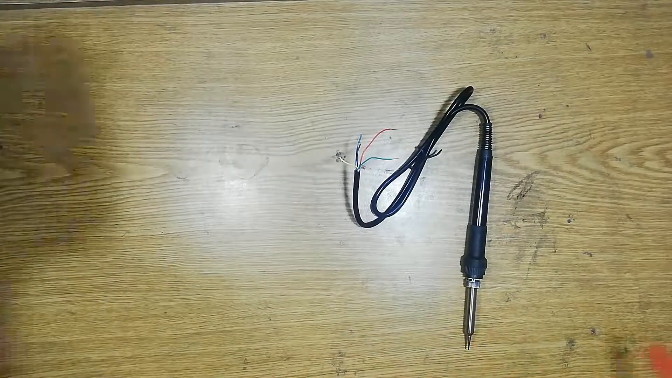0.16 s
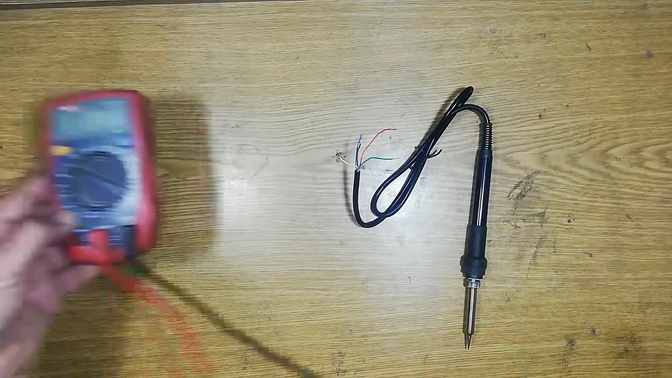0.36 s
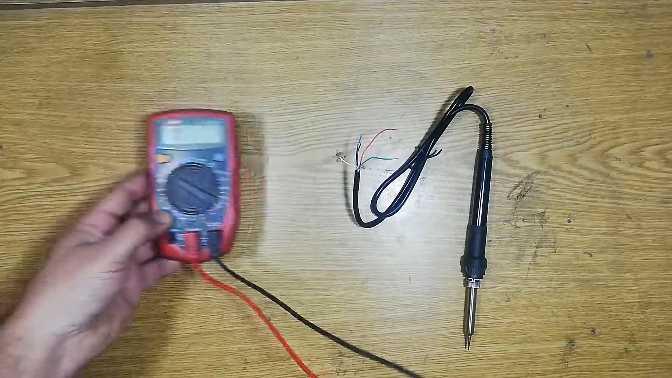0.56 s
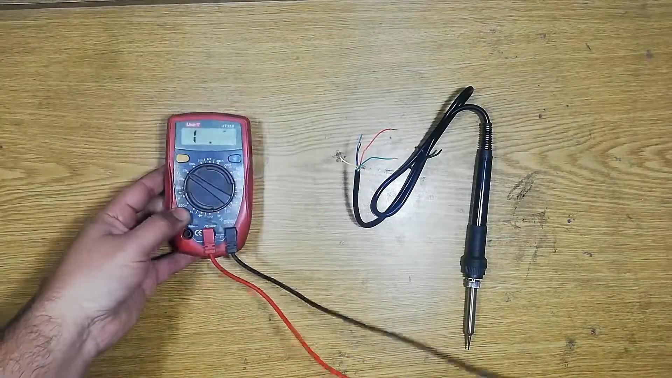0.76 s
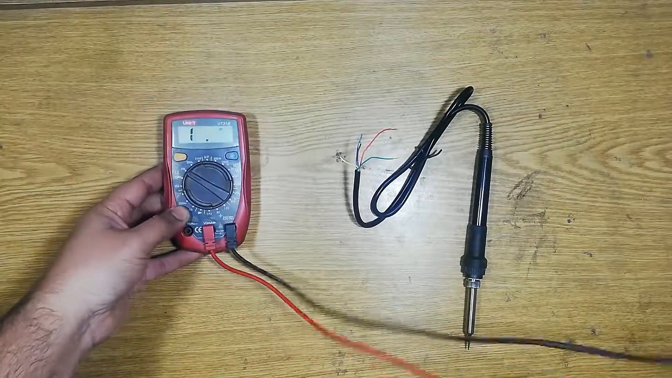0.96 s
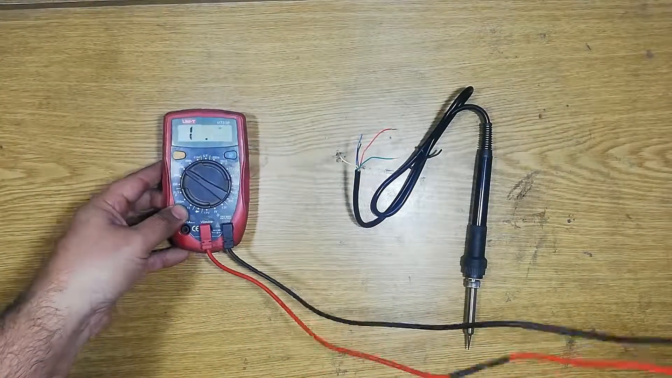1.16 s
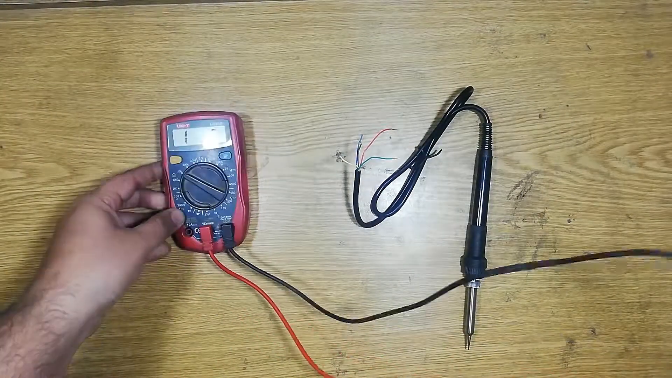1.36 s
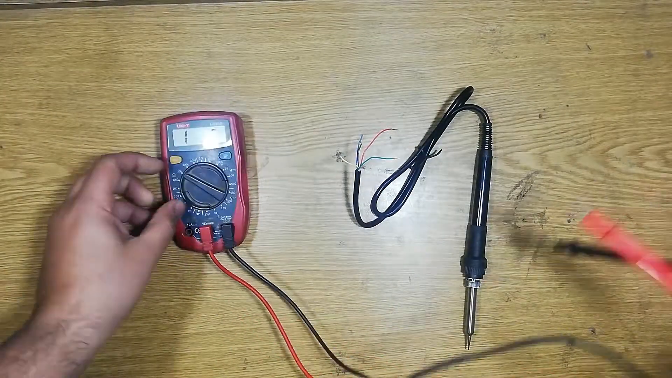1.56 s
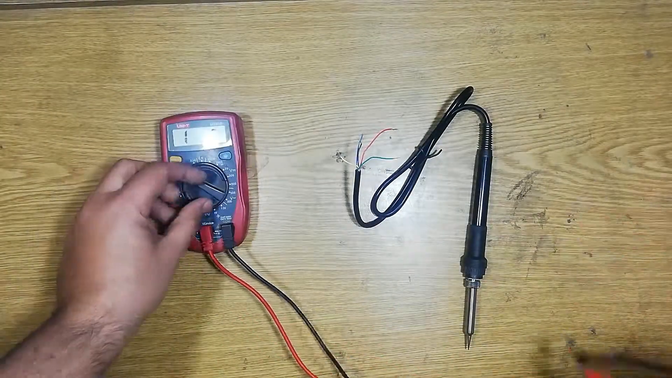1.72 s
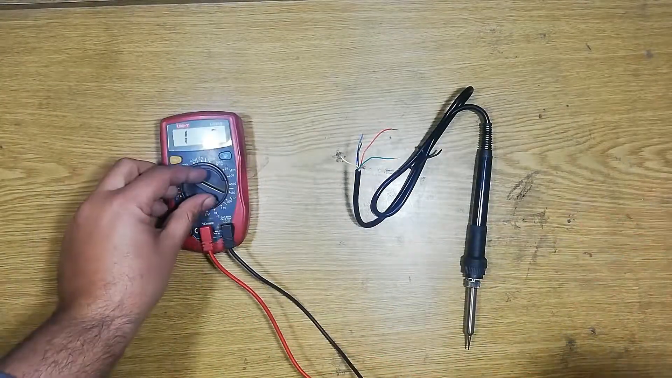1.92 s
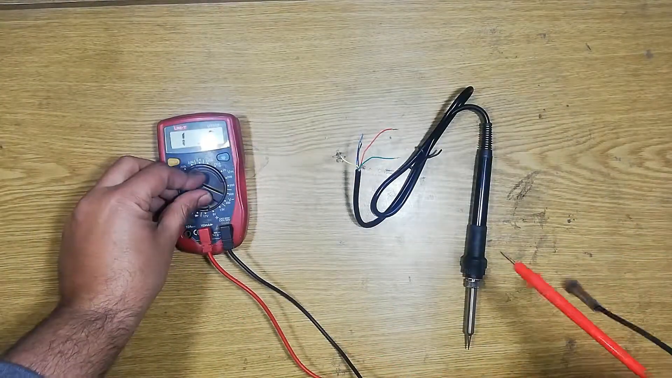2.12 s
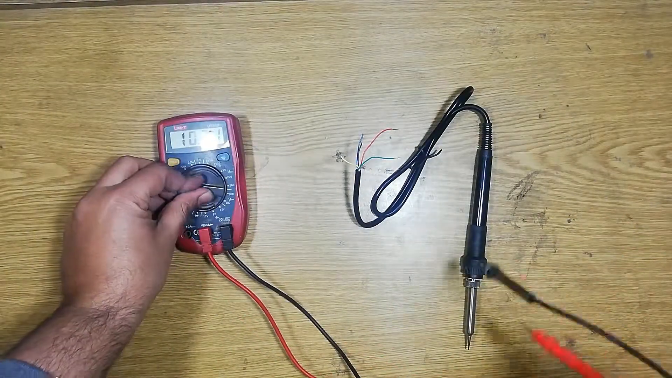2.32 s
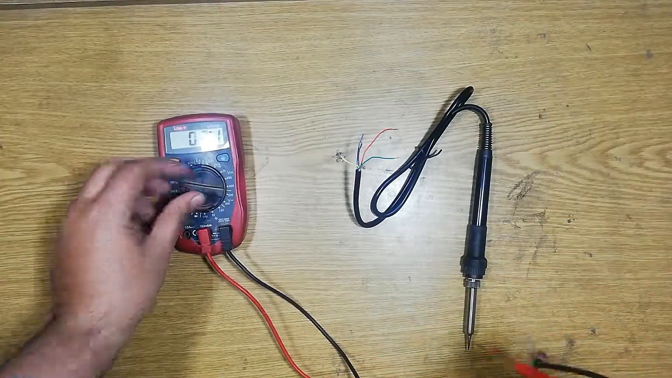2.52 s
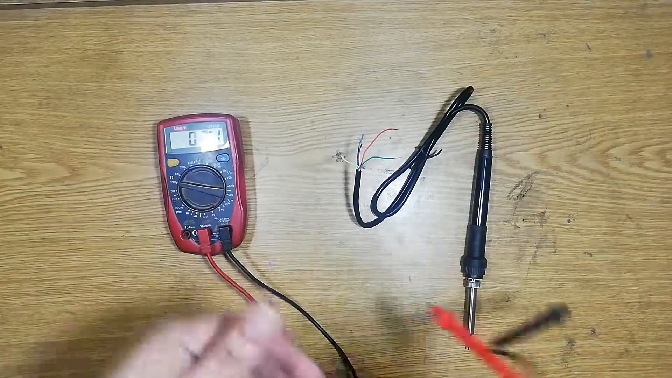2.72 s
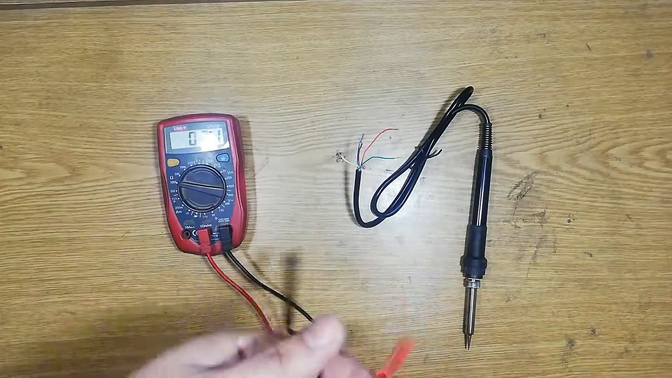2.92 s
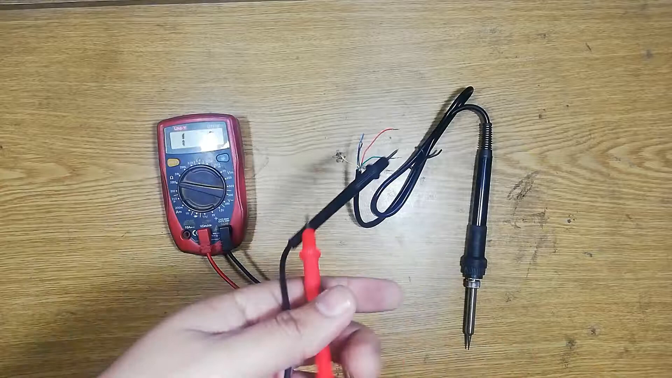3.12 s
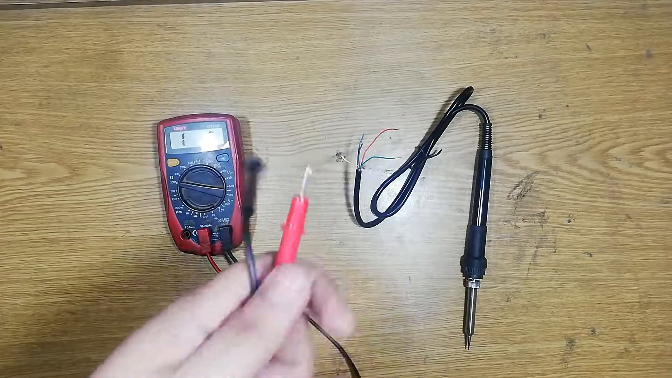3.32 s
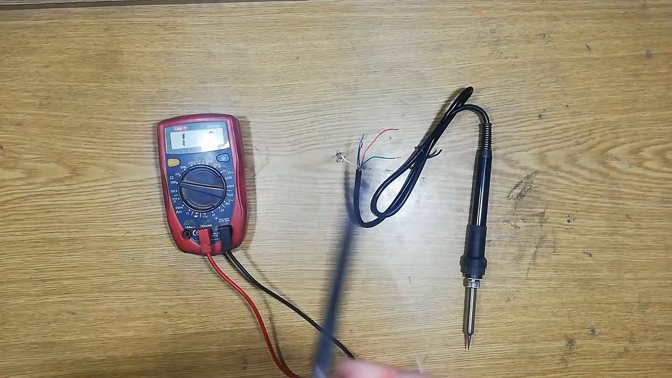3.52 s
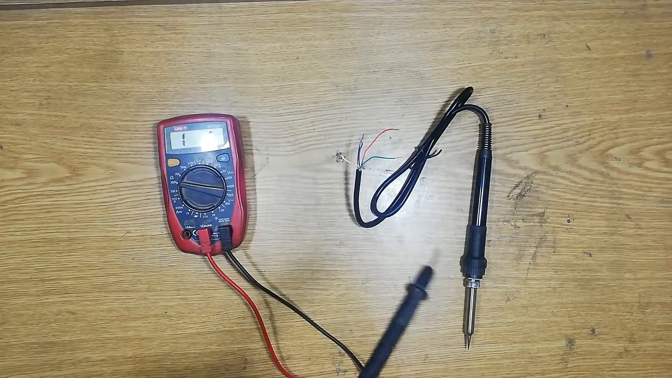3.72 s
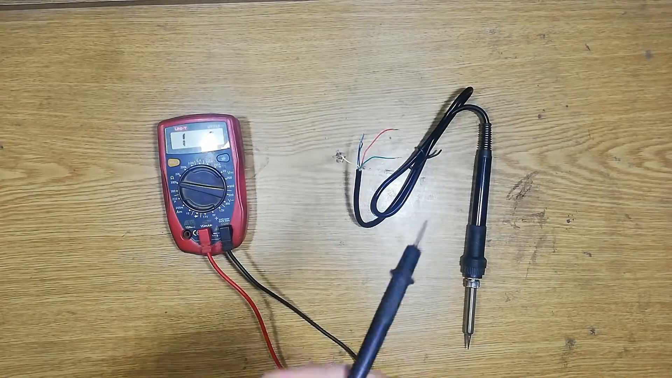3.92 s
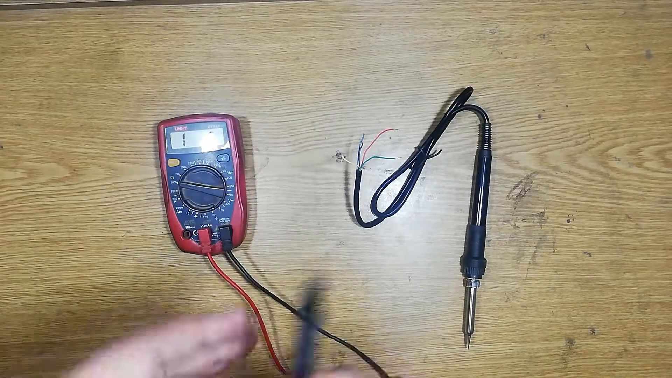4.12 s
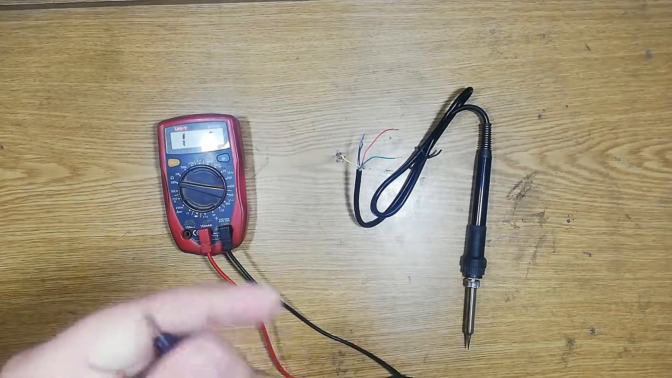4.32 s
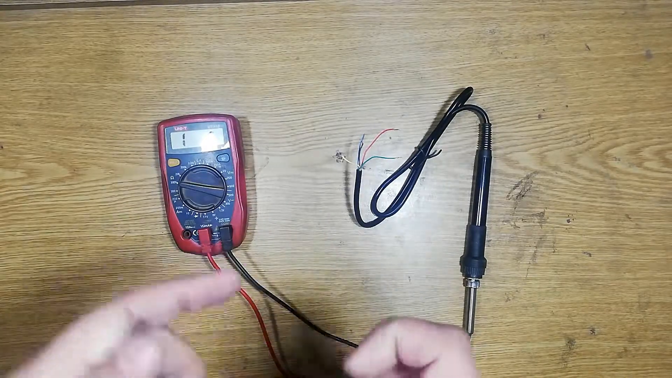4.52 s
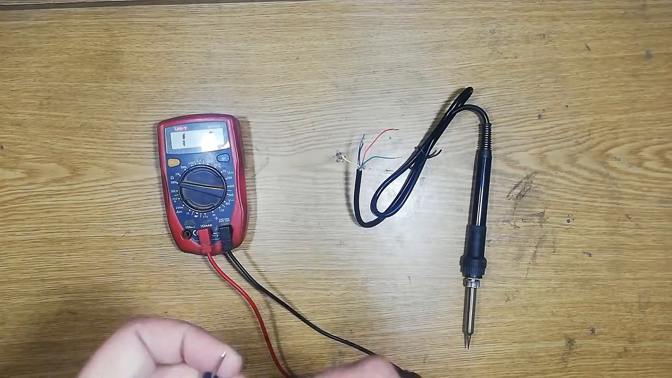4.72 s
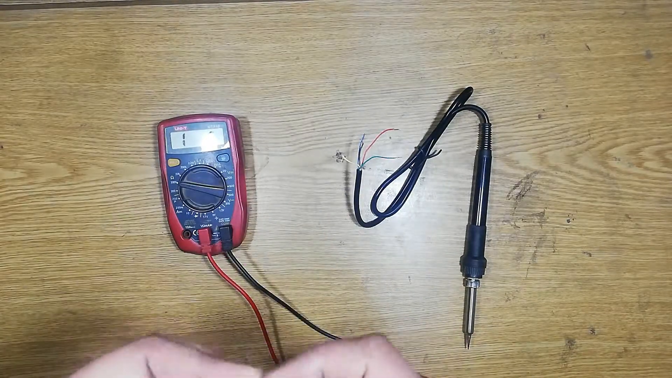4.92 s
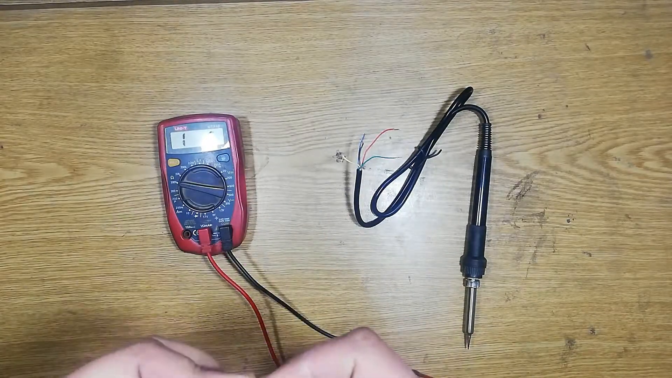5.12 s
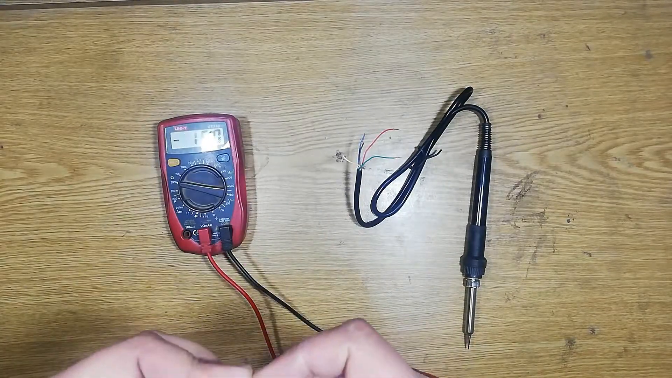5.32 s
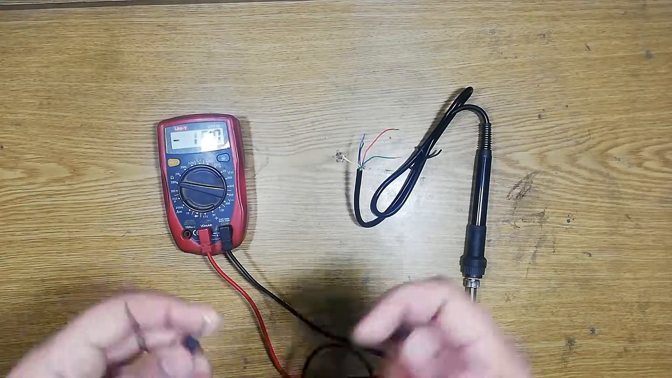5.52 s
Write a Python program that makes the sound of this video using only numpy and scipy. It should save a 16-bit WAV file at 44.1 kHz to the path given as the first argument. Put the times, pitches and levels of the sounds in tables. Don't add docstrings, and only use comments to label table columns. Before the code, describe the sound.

A low, steady hum fills a small bare room, with faint lead rustle and tiny ticks from 0.2 to 0.6 s. At 0.77 s a plastic meter hits a hollow wooden table in a rapid cluster of booming knocks and case clatter, with hard probe ticks until 0.95. Lighter taps lead to a second, brighter and louder burst at 1.28-1.34, overloading the overhead phone microphone. Leads drag around 1.45; metal tips clink at 1.85, with a soft low thump at 1.95. A dial snaps sharply at 2.3, then probe taps and detent clicks follow at 2.5-2.6. Bright ticks bounce at 2.8-3.2, a plastic handle lands at 3.35, and a small tick follows at 3.6. It grows quiet: a dull tap at 3.98, airy finger rubbing around 4.4-4.6, a bright nail flick at 4.93, and a small cap tap at 5.49. Weak pre-echoes slightly smear the contacts.

```python
import sys
import numpy as np
from scipy import signal
from scipy.fft import rfft, irfft, next_fast_len
from scipy.io import wavfile
from scipy.ndimage import map_coordinates

SR = 44100
rng = np.random.default_rng(int(sys.argv[2]) if len(sys.argv) > 2 else 0)


def persist_wave(psi):
    counts = np.round(np.clip(psi, -1, 1) * 32767).astype(np.int16)
    wavfile.write(sys.argv[1], SR, np.atleast_2d(counts).T)


def magnitude_from_level(level_db):
    exponent = np.asarray(level_db, float) / 20
    return 10 ** exponent


N = 245267
LEAD_IN = 4410


def along(points, hz):
    f, v = np.transpose(points)
    return np.interp(np.log(hz + 1), np.log(f + 1), v)


def unit(x):
    return x / np.sqrt(np.mean(x ** 2) + 1e-20)


def filtered(x, response):
    n = x.shape[-1]
    m = next_fast_len(n + 2048)
    return irfft(rfft(x, m) * response(np.fft.rfftfreq(m, 1 / SR)), m)[..., :n]


def resonances(modes):
    def response(f):
        return sum(magnitude_from_level(db) * (1j * f * w / (c * c - f * f + 1j * f * w)) ** 2 for c, w, db in modes)
    return response


# freq_hz, correlation
LIKENESS = [(50, 1), (250, .85), (600, 0.046), (3000, 0.094)]


def alike(pair, hz):
    turn = np.arccos(np.clip(along(LIKENESS, hz), -1, 1)) / 2
    shared, differing = pair[0] * np.cos(turn), pair[1] * np.sin(turn)
    return np.array([shared + differing, shared - differing])


def rush(response):
    m = next_fast_len(N)
    hz = np.fft.rfftfreq(m, 1 / SR)
    spectra = alike(rfft(rng.standard_normal((2, m))), hz)
    return unit(irfft(spectra * response(hz), m)[:, :N])


def strokes(rows):
    t = np.arange(N) / SR
    loss_db = 21.5
    return sum(magnitude_from_level(db - loss_db * np.where(t < s, (s - t) / rise, (t - s) / fall)) for s, db, rise, fall in rows)


# freq_hz, t60_s
ROOM_DECAY = [(100, 0.24), (1000, 0.47), (2000, 0.28), (4000, 0.32), (8000, 0.21), (12000, 0.34),
              (14000, 0.17), (16000, 0.24)]


def room(x, wet_db, gap_s, cut):
    hz = np.fft.rfftfreq(256, 1 / SR)[:, None]
    t = np.arange(140) * 128 / SR
    z = rng.standard_normal((2, len(hz), 2 * len(t))).view(complex)
    fall_db = -60 * t / along(ROOM_DECAY, hz) * (1 - cut) - 60 * cut * (t / 0.34) ** 3
    tail = signal.istft(alike(z, hz) * magnitude_from_level(fall_db), SR, nperseg=256)[1]
    tail *= 1 - np.exp(-np.arange(tail.shape[1]) / SR / gap_s)
    return magnitude_from_level(wet_db) * signal.fftconvolve(x[None], tail / np.linalg.norm(tail[0]), axes=1)


def spread(direct, wet, pan_db, lag=0):
    delays = [max(round(lag), 0), max(-round(lag), 0)]
    both = [np.pad(direct, (k, wet.shape[1] - len(direct) - k)) for k in delays]
    return wet + both * magnitude_from_level(np.array([[pan_db / 2], [-pan_db / 2]]))


def add(out, sound, start_s, forerunner_db):
    overlap_s = .0174
    for k, db in enumerate([0, forerunner_db, 2.6 * forerunner_db]):
        seat = out[:, LEAD_IN + round((start_s - k * overlap_s) * SR):][:, :sound.shape[1]]
        seat += magnitude_from_level(db) * sound[:, :seat.shape[1]]


def ticks(events, modes, edges_hz, lowest_db, crack_db, wet_db, forerunner_db, lag):
    out = np.zeros((2, N + LEAD_IN))
    t = np.arange(SR // 20) / SR
    group = np.searchsorted(edges_hz, [m[0] for m in modes])
    middle_modes = [m for m, k in zip(modes, group) if k == 2]
    crack = (7300, 5600, crack_db)
    for s, db, shaft_db, tip_db, pan_db in events:
        shift_db = np.array([shaft_db + lowest_db, shaft_db, 0, tip_db])[group]
        struck = [(c, w, g + d) for (c, w, g), d in zip(modes, shift_db)] + [crack]
        chatter = rng.standard_normal(len(t)) * magnitude_from_level(-60 * t / 0.014) * (1 - np.exp(-t / 0.00071))
        chatter += 3.8 * (t == 0)
        ring = filtered(chatter, resonances(struck))
        blow = (t == 0) * np.linalg.norm(chatter)
        even = filtered(blow, resonances([(c, w + 150, g) for c, w, g in struck if c > 900]))
        middle = filtered(chatter, resonances(middle_modes))
        sound = spread(ring, room(even, wet_db, gap_s=0.00067, cut=0.099), pan_db, lag)
        add(out, sound * magnitude_from_level(db) / np.abs(middle).max(), s, forerunner_db)
    return out


# freq_hz, density_db_per_hz
HUSH_SPECTRUM = [(15, -43.5), (25, -21), (53, 5), (84, -19.5), (116, 2.5), (152, -19), (179, -6),
                 (205, -17.5), (235, -14.5), (352, -23), (600, -32.5), (1120, -23.5), (1320, -30),
                 (11000, -37), (15800, -43)]


def hush():
    return magnitude_from_level(-53.5) * rush(lambda hz: magnitude_from_level(along(HUSH_SPECTRUM, hz)))


# peak_s, level_db, rise_s, fall_s
LEAD_STROKES = [(.0, -53, 0.037, 0.076), (.7, -55, 0.3, 0.34), (1.44, -45, 0.11, 0.17),
                (1.83, -59.5, 0.27, 0.3), (2.45, -61, .12, 0.4), (3.47, -63, .4, .25),
                (4.75, -63.5, 0.29, 0.27)]


def leads():
    at_rest_db = -77
    return magnitude_from_level(0.5) * (strokes(LEAD_STROKES) + magnitude_from_level(at_rest_db)) * rush(resonances([(1897, 710, 0)]))


# peak_s, level_db, rise_s, fall_s
FINGER_STROKES = [
    (4.374, -64.5, 0.14, .07),
    (4.54, -58.5, .18, .08),
    (4.65, -71, 0.09, 0.23),
]


def fingers():
    t = np.arange(N) / SR
    grip = map_coordinates(rng.standard_normal(400), [t * 60])
    return magnitude_from_level(2) * strokes(FINGER_STROKES) * magnitude_from_level(1.5 * grip) * rush(resonances([(11400, 11000, 0)]))


# start_s, level_db, shaft_db, tip_db, pan_db
FLICKS = [
    (4.9267, -27.5, -10, -7, -5.5),
    (4.9366, -21.5, -24, -8, -7.5),
    (4.9432, -20.5, -34.5, -7.5, -8),
]
# freq_hz, width_hz, level_db
NAIL_MODES = [(5630, 1550, -7), (9535, 2100, -3), (10800, 1600, 0), (12400, 580, -1.5), (14800, 1800, 1.5)]


def fingernail():
    return ticks(FLICKS, NAIL_MODES, [3000, 7000, 13500], lowest_db=0, crack_db=-30.5,
                 wet_db=1.0, forerunner_db=-12.5, lag=12)


# start_s, level_db, shaft_db, tip_db, pan_db
CAP_CONTACTS = [
    (1.9475, -28, -10.5, -2, -10.5),
    (3.9802, -24.5, -14.5, -31.5, 10.5),
    (5.4935, -23, -1, -9.5, -9),
]
# freq_hz, width_hz, level_db
CAP_MODES = [(4300, 340, 4.5), (5040, 770, 11), (6917, 1800, -4), (9236, 1600, 4), (11100, 2400, -6),
             (14500, 1500, -14.5)]


def tip_cap():
    return ticks(CAP_CONTACTS, CAP_MODES, [4700, 6000, 8000], lowest_db=1.5, crack_db=-30,
                 wet_db=-3.5, forerunner_db=-10.5, lag=12)


# start_s, level_db, shaft_db, tip_db, pan_db
HANDLE_CONTACTS = [
    (3.3513, -2, -16.5, -14, -1),
    (3.3626, -12.5, -17.5, -13, -2),
]
# freq_hz, width_hz, level_db
HANDLE_MODES = [(1570, 380, -14), (2070, 390, 8.5), (2540, 230, 3), (4584, 550, -0.5), (5700, 470, 0),
                (7208, 680, 3), (8900, 930, 3), (10497, 730, 10), (12690, 700, -2)]


def probe_handle():
    return ticks(HANDLE_CONTACTS, HANDLE_MODES, [2400, 3700, 9700], lowest_db=12, crack_db=-31.5,
                 wet_db=-6, forerunner_db=-10.5, lag=-2)


# start_s, level_db, shaft_db, tip_db, pan_db
DETENT_CLICKS = [
    (2.462, -52, 24, -15, -2),
    (2.480, -47, 15.5, -22, 6),
    (2.603, -15.5, -11.5, -7.5, -11.5),
    (2.764, -48.5, 22.5, -11.5, -2),
]
# freq_hz, width_hz, level_db
SPRING_MODES = [(1087, 230, 0.023), (2137, 430, 0.029), (2954, 465, 0.00027), (4180, 1100, 0.004)]


def detent():
    return ticks(DETENT_CLICKS, SPRING_MODES, [1500, 2500, 3600], lowest_db=-18, crack_db=-29.5,
                 wet_db=-5, forerunner_db=-9, lag=-19.5)


# start_s, level_db, shaft_db, tip_db, pan_db
DIAL_SNAPS = [
    (2.304, 8.5, -7, -9, -7.5),
    (2.328, -9, -17.5, -15, -6.5),
]
# freq_hz, width_hz, level_db
DIAL_MODES = [(553, 2000, 3), (2100, 710, 6.5), (2860, 700, -5), (3740, 720, 4), (4488, 1100, 5),
              (5863, 1600, 2), (7900, 2900, -4), (9600, 2600, 3), (12900, 1200, -3.5)]


def dial():
    return ticks(DIAL_SNAPS, DIAL_MODES, [1500, 2500, 9000], lowest_db=-6.0, crack_db=-10,
                 wet_db=-4.5, forerunner_db=-12, lag=-18.5)


# start_s, level_db, shaft_db, tip_db, pan_db
CROSSED_CONTACTS = [
    (1.8214, -20.5, -19.5, -12.5, 2.5),
    (1.8384, -16, -22.5, -13.5, 12),
    (1.8452, -3, -27, -15.5, 5),
    (1.8574, -15, -48.5, -21, -6),
    (1.9141, -42.5, -1, -7.5, -4.5),
]
# freq_hz, width_hz, level_db
CROSSED_MODES = [(2387, 270, -6), (3434, 790, 5), (5466, 1500, -1), (7646, 410, 4.5), (9800, 1100, -15.5),
                 (11734, 350, 7), (15320, 800, -9.5)]


def crossed_tips():
    return ticks(CROSSED_CONTACTS, CROSSED_MODES, [4500, 6500, 10500], lowest_db=-6, crack_db=-23.5,
                 wet_db=-11.5, forerunner_db=-14, lag=24)


# start_s, level_db, shaft_db, tip_db, pan_db
RED_CONTACTS = [(.1974, -36, -14, -2.5, -3), (.2144, -25, -23, -6.5, -9), (.2714, -28, -34.5, -3, 13),
                (.2816, -40.5, -39, -11.5, 4.5), (.5595, -32.5, -21.5, 2, 6.5), (.5763, -44, -21, 3.5, 3),
                (.594, -40, -20, 5, -3), (1.1496, -13, -8.5, 3.1, -3), (1.1643, -20, -3.5, -4, 1.5),
                (1.1812, -29.5, -6, 3, 5), (3.6058, -33.5, -21, -2.5, -5.5),
                (3.6221, -20.5, -44, -0.5, -13.5)]
RED_WOOD_CONTACTS = [
    (1.0352, -8.5, -16.5, -3.5, -4.5),
    (1.047, -19, -16, -9, -1),
    (2.509, -21, -9, 2, -1.5),
    (2.5112, -6, -16.5, 1.5, 1),
    (2.519, -16, -13, -1, -1),
    (2.5696, -19, -26, -5, -8.5),
]
# freq_hz, width_hz, level_db
RED_MODES = [(3085, 210, 3), (5210, 300, 10.5), (7550, 560, -3.5), (7523, 190, -0.5), (8300, 530, -5),
             (10760, 250, 1), (11290, 270, 2.5), (11600, 510, -8.5), (15504, 1100, -15.5)]


def red_probe():
    edges_hz = [4000, 6500, 9700]
    light = ticks(RED_CONTACTS, RED_MODES, edges_hz, lowest_db=-11.0, crack_db=-23.5,
                  wet_db=-9, forerunner_db=-9.5, lag=24)
    on_wood = ticks(RED_WOOD_CONTACTS, RED_MODES, edges_hz, lowest_db=9.5, crack_db=-11.5,
                    wet_db=-10.5, forerunner_db=-9.5, lag=-1.5)
    return light + on_wood


# start_s, level_db, shaft_db, tip_db, pan_db
BLACK_CONTACTS = [(.8694, -4, -15.5, -4.5, -3), (.8867, 8, -8, -1.5, -5.5),
                  (.9352, -3.5, -18.5, -12.5, -3.3), (1.3723, -17, -17.5, -7, -5),
                  (1.3872, 3, -16.5, -10.5, -18.5), (2.805, -3, -14.5, -10, 5.5),
                  (2.8144, -26.5, -13, -8, -4), (2.8294, -22, -17, -11, -0.5),
                  (2.8843, -15.5, -24, 0.5, -3.95), (2.9731, -26, -28, -20.5, 8),
                  (3.0744, -24, -26, -2.5, 6), (3.0879, -13, -17, 1.5, -5.5), (3.0934, -14, -23, -4, 6.5),
                  (3.1066, -1.56, -19, 1, 2), (3.1184, -29, -19, -1.15, -8.5), (3.1901, -25.5, -36, 8, -7),
                  (3.1964, -33.5, -27, 5.5, -6), (3.2584, -41, -20, 8, -5),
                  (-.025, -17, -7, -5, -2),
]
# freq_hz, width_hz, level_db
BLACK_MODES = [(3150, 380, 5), (5220, 640, 3), (6670, 2200, -15.5), (8110, 320, 5.5), (8620, 3000, -6),
               (11000, 780, 2.3), (11627, 450, 0.5), (13460, 1300, -11.5), (16100, 900, -14.5)]


def black_probe():
    return ticks(BLACK_CONTACTS, BLACK_MODES, [4000, 6000, 9900], lowest_db=-4.5, crack_db=-17,
                 wet_db=-6, forerunner_db=-13, lag=-3.5)


# start_s, level_db, hardness_hz
BLOWS = [(.772, 3.5, 921.5), (.789, 8.5, 1368), (.801, 4.5, 1102), (.84, 2, 311.5), (.921, -2.5, 196),
         (1.112, -45, 257.3), (1.2807, 10, 1247), (1.288, 10, 1431), (1.303, 10, 1820), (1.311, 6.5, 2205),
         (1.329, -1.5, 2200), (1.34, -1, 600), (1.8, -38, 306), (1.951, -18.5, 90), (2.302, -36, 584),
         (2.459, -17, 313), (2.497, -19.5, 302), (2.532, -24, 206), (3.354, -39.5, 400)]
# freq_hz, level_db, t60_s
TABLE_MODES = [(63.6, -19.5, 1), (110.08, -5.5, 0.75), (114.36, -5.5, 0.31), (171.63, 2, 0.13),
               (187.1, -7, 0.5), (248, -9.5, 0.57), (281, 0.5, 0.1), (378, -18.5, 0.6), (414, -18, 0.6),
               (517, -24.5, 0.078), (640, -26, 0.04), (923.4, -14, 0.36), (983, -26, 0.12),
               (1116, -14, 0.093), (1223.3, -23.5, 0.079)]
# freq_hz, density_db_per_hz
CASE_SPECTRUM = [(250, -8), (450, -8.5), (720, -16.5), (1150, -8), (2200, -13.5), (4000, -19), (11000, -18),
                 (14500, -37.5)]


def knocks():
    out = np.zeros((2, N + LEAD_IN))
    t = np.arange(int(.6 * SR)) / SR
    steepening_db = -60 * (t / 0.2) ** 3
    for s, db, hard_hz in BLOWS:
        def reach_db(hz):
            return -20 * np.log10(1 + (hz / hard_hz) ** 2)

        def case(hz):
            return magnitude_from_level(along(CASE_SPECTRUM, hz) + .5 * reach_db(hz)) * (hz > 250)

        wood = np.zeros(len(t))
        for hz, mode_db, t60_s in TABLE_MODES:
            level_db = mode_db + rng.normal(0, 2) + reach_db(hz)
            wood += magnitude_from_level(level_db - 60 * t / t60_s + steepening_db) * np.sin(2 * np.pi * hz * t)
        boom = magnitude_from_level(db - 6.5) * wood * (1 - np.exp(-t / 0.0041))
        clatter = unit(filtered(rng.standard_normal(len(t)), case))
        clatter *= (1 - np.exp(-t / 0.0017)) * magnitude_from_level(db - 8.0 - 60 * t / 0.055)
        clatter *= np.clip(hard_hz / 1500, 0, 2)
        wet = room(clatter, wet_db=-4.0, gap_s=0.0031, cut=0.54) + room(boom, wet_db=-14, gap_s=0.044, cut=.9)
        forerunner_db = -1.5 - 14 * hard_hz / 1e3
        add(out, spread(boom + clatter, wet, pan_db=4), s, forerunner_db)
    return out


def scene():
    background = hush() + leads() + fingers()
    contacts = fingernail() + tip_cap() + probe_handle() + detent() + dial()
    contacts += crossed_tips() + red_probe() + black_probe()
    return background + (contacts + knocks())[:, LEAD_IN:]


def low_pass(x):
    return signal.sosfilt(signal.butter(12, 15960, fs=SR, output="sos"), x)


def record(dry):
    heard = filtered(dry, lambda hz: (1j * hz / (40 + 1j * hz)) ** 2)
    overloaded = heard / (1 + np.abs(heard) ** 20) ** (1 / 20)
    return low_pass(overloaded)


dry = scene()
out = record(dry)
persist_wave(out)
```